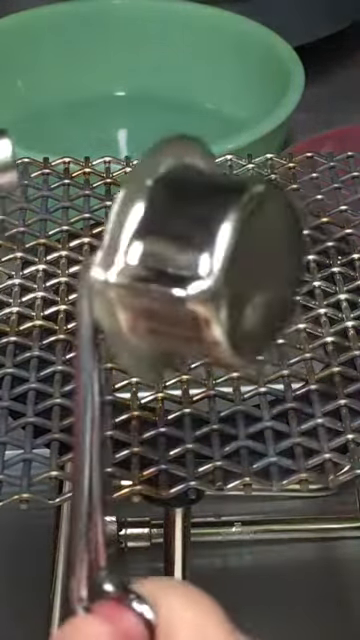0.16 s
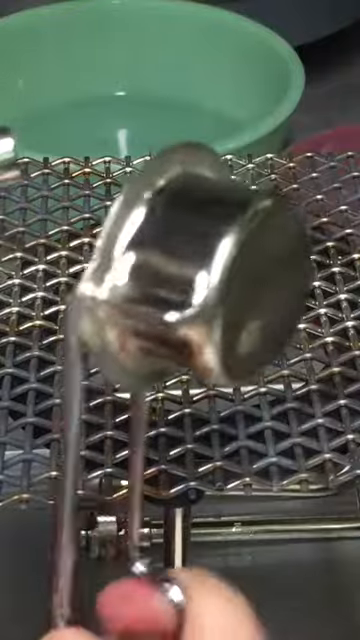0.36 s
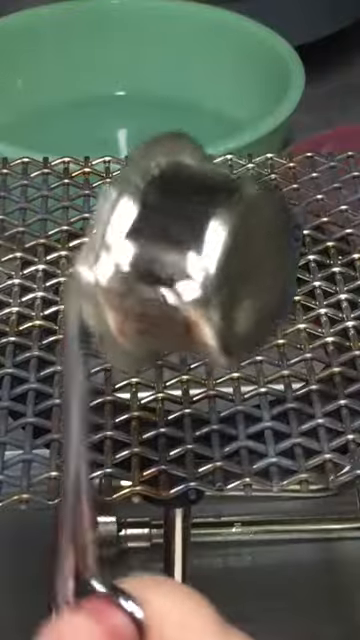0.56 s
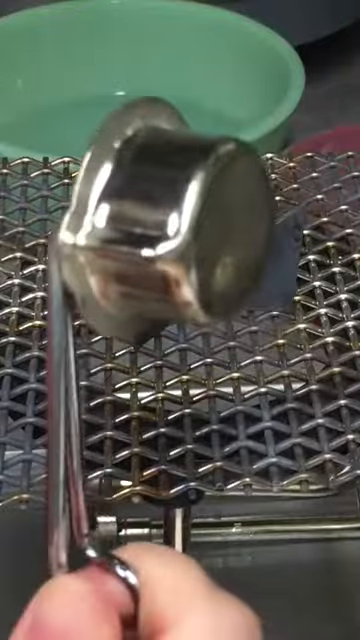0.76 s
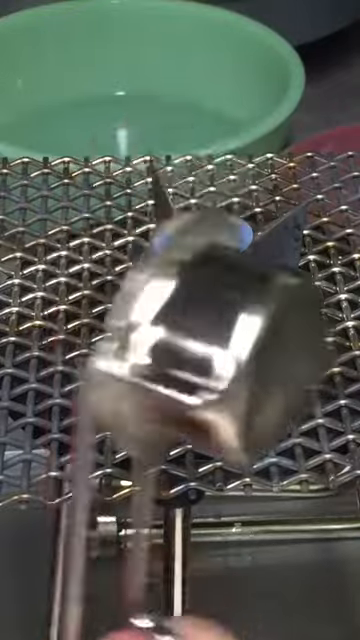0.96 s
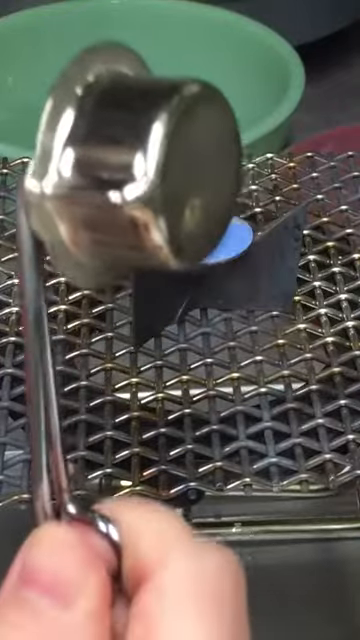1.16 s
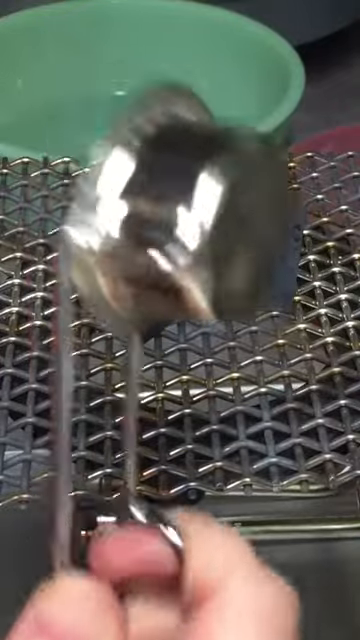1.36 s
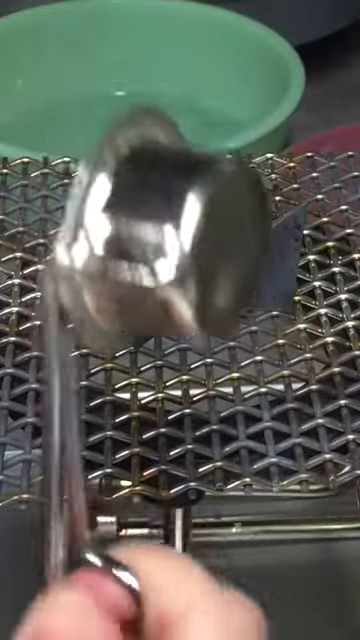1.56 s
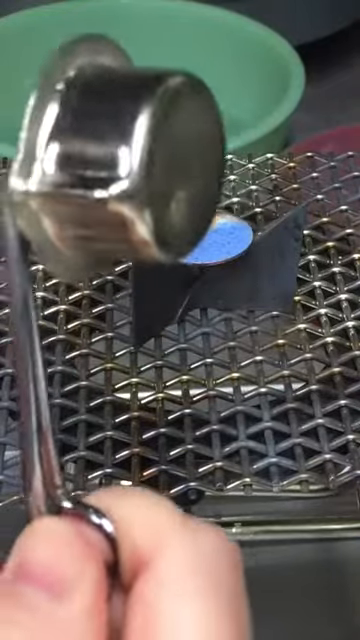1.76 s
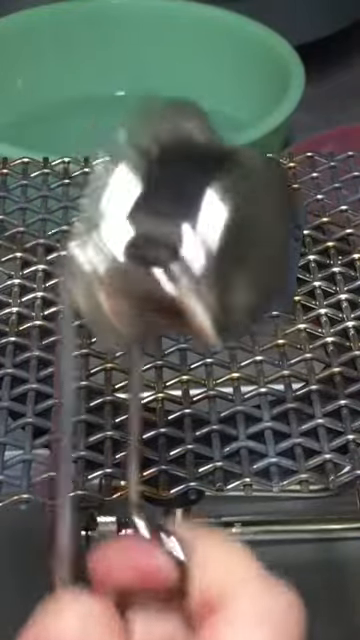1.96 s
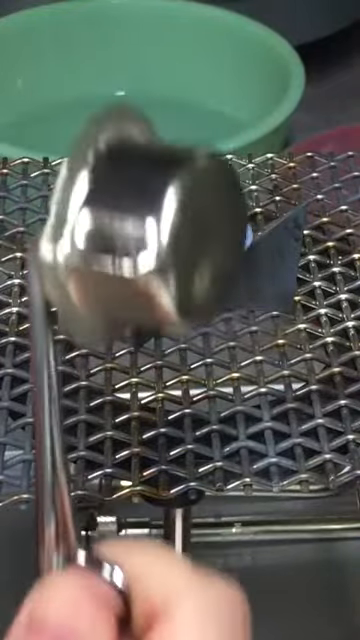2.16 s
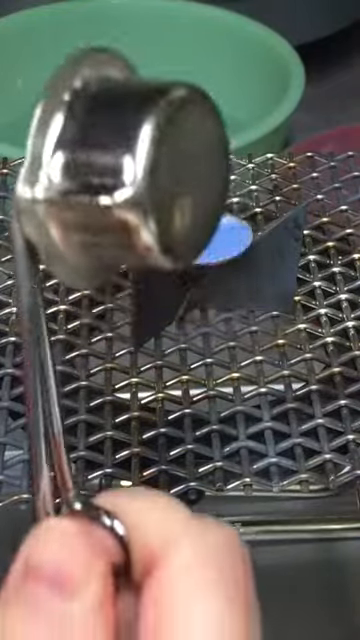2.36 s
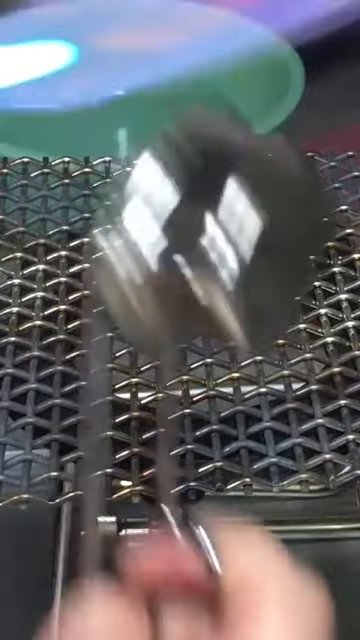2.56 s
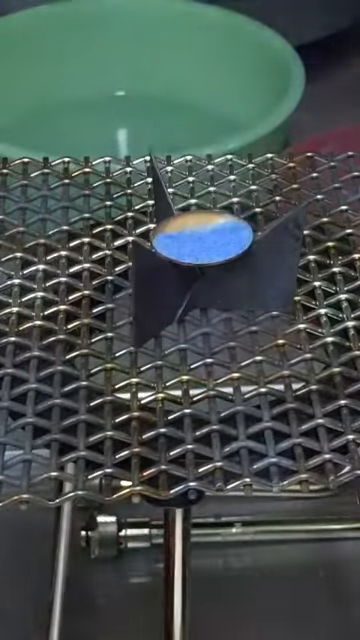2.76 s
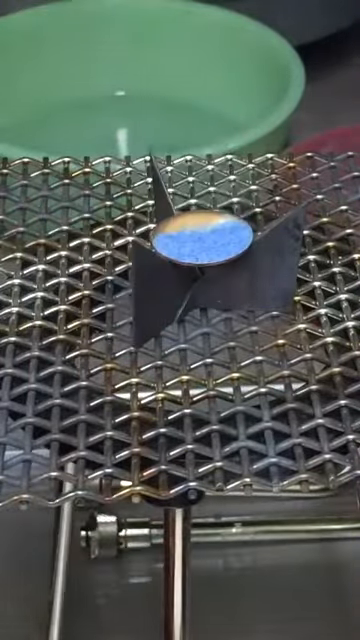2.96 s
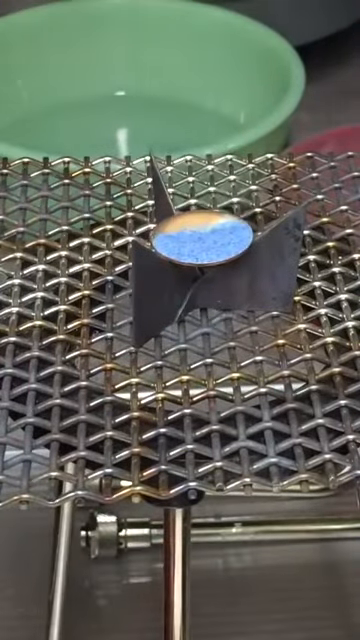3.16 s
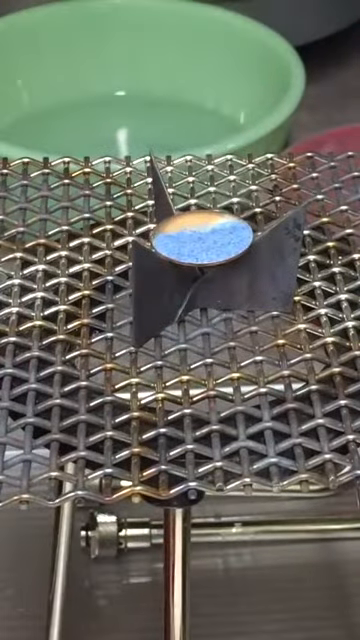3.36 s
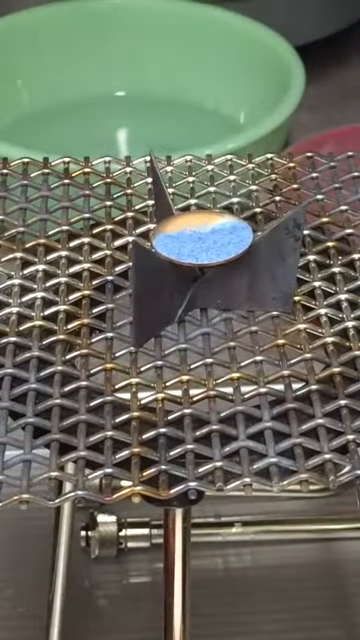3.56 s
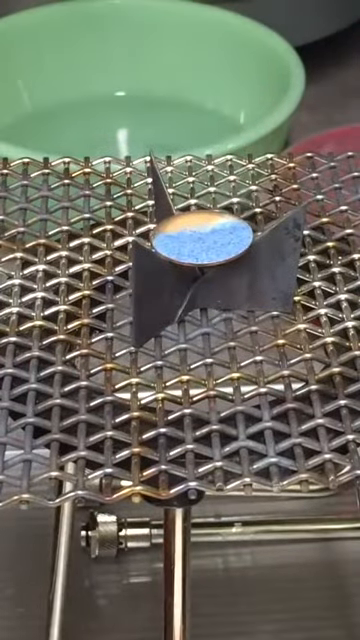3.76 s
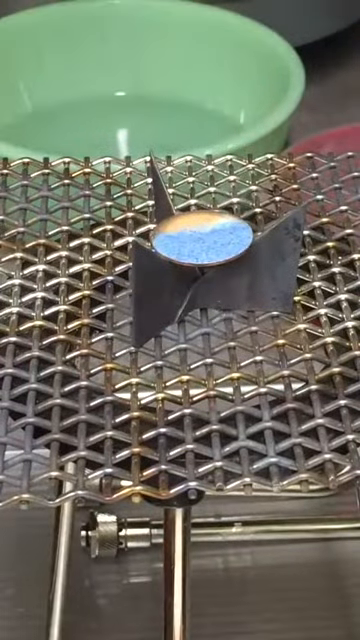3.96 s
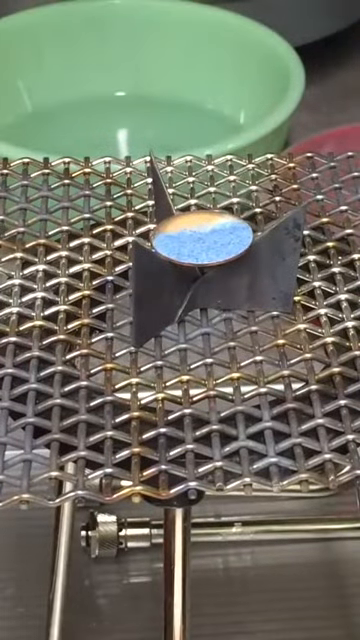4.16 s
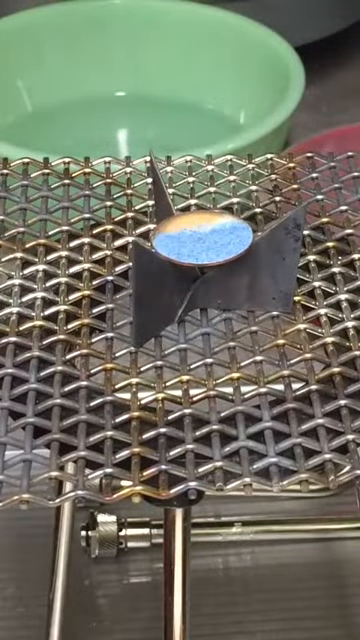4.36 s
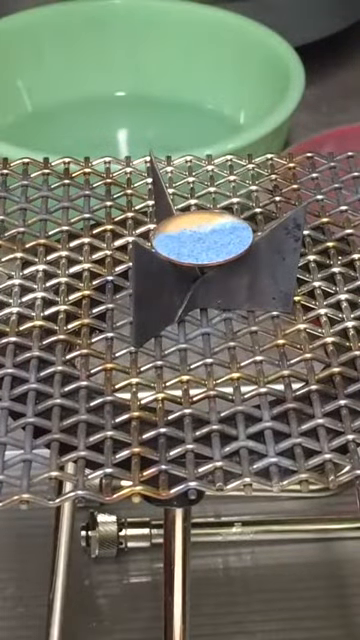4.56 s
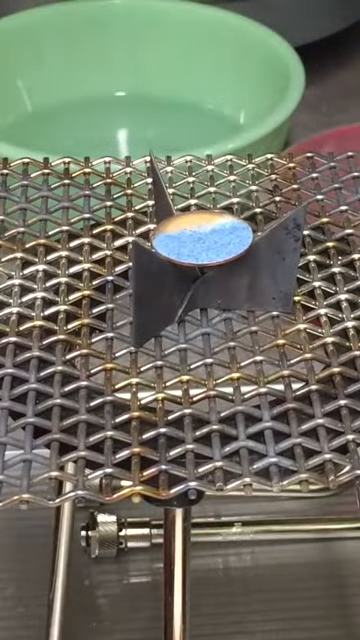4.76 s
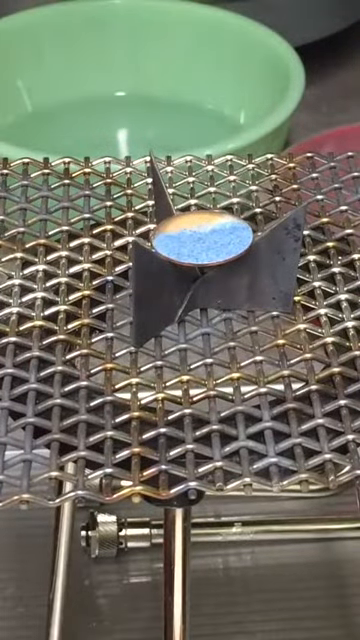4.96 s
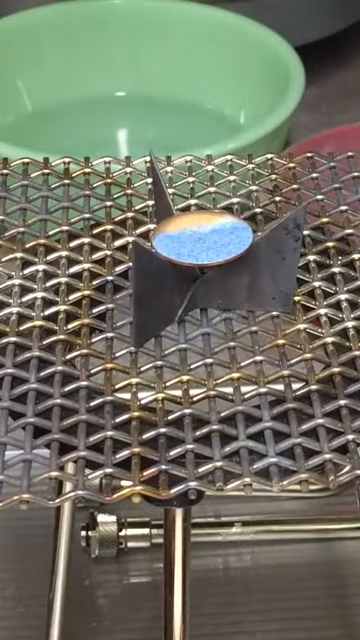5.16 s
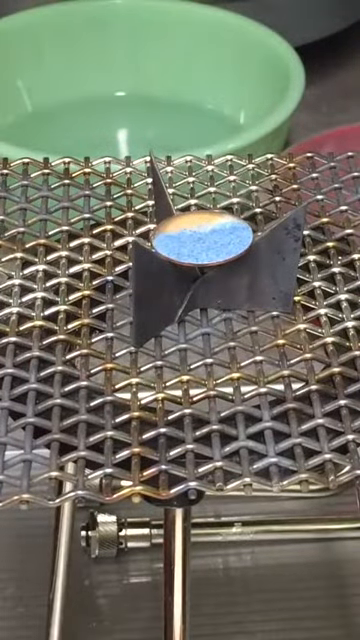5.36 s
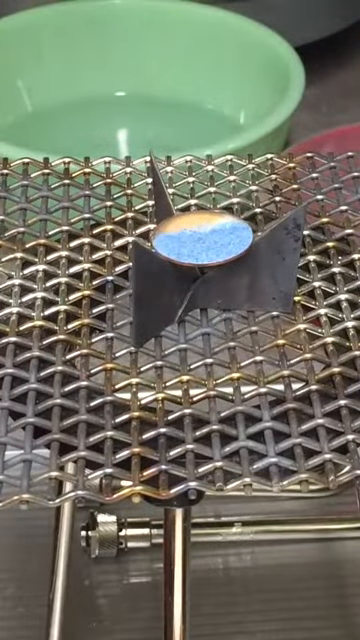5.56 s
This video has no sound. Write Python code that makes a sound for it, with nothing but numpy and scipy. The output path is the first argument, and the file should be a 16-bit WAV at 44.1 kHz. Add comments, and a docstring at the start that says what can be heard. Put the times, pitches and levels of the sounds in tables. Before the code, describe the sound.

In a workshop, a hand-held flint striker is squeezed back and forth about ten times, each stroke a short gritty scrape with a bright steel click, over a faint gas hiss. A torch then catches with a loud pop and burns with a steady, hissing roar. Near the end the flame drops to a quieter, duller sputter. The sound is close, with little echo.

```python
"""In a workshop, a flint striker is squeezed to and fro over its file until a gas torch lights.
Friction and impacts excite the normal modes of the striker's steel cup and spring arms. The gas
ignites with a pop that overloads the input; turbulent combustion then roars, is turned down and
sputters as gas pockets burst. Throughout, the jet hisses and drives standing waves in the nozzle
tube, over a low room hum."""
import sys
import numpy as np
from scipy import signal
from scipy.fft import rfft, irfft, next_fast_len
from scipy.io import wavfile

SR = 44100
rng = np.random.default_rng(int(sys.argv[2]) if len(sys.argv) > 2 else 0)


def transcribe(signal):
    """Save signal, clipped to [-1, 1], as a 16-bit WAV file at the path in sys.argv[1]."""
    frames = np.atleast_2d(signal).T
    limited = np.clip(frames, -1, 1)
    pcm = np.round(limited * 32767).astype(np.int16)
    wavfile.write(sys.argv[1], SR, pcm)


N = 247306

# flint catching on a tooth of the file: start_s, level_db
FLINT_CATCHES = [(0.0024, -25.5), (0.1331, -37), (0.1447, -25), (0.1478, -16.5), (0.1634, -23),
                 (0.177, -14), (0.196, -14.5), (0.1998, -10.5), (0.2204, -16), (0.3877, -29), (0.414, -26),
                 (0.4575, -16), (0.5834, -30.5), (0.5954, -24), (0.6026, -28), (0.6096, -25), (0.622, -30),
                 (0.6363, -15.5), (0.6523, -20), (0.8778, -17.5), (0.902, -18.5), (0.912, -18),
                 (1.067, -34), (1.0775, -19), (1.083, -15), (1.0986, -7.5), (1.1235, -5), (1.143, -12),
                 (1.3876, -22.5), (1.404, -26), (1.416, -21), (1.427, -13.5), (1.5952, -16.5),
                 (1.6004, -12.5), (1.6193, -9.5), (1.6442, -5.5), (1.6654, -13), (1.9364, -13.5),
                 (1.955, -15.5), (1.976, -13.5), (2.141, -29.5), (2.1561, -10.5), (2.177, -8.5),
                 (2.195, -10.5), (2.2096, -13.5), (2.218, -9.5), (2.5357, -14.5)]
# strokes of the flint; return strokes bite higher and ring the cup less:
# start_s, end_s, rasp_db, bite_hz, cup_share_db, finger_rumble_db
FLINT_STROKES = [(0.142, 0.244, -34, 3230, 4, -68), (0.403, 0.473, -31.5, 3780, -0.5, -62.5),
                 (0.575, 0.667, -28, 3280, 12, -61), (0.892, 0.934, -27.5, 3900, -10, -68),
                 (1.078, 1.16, -53, 3180, 2.5, -62.5), (1.393, 1.454, -30, 4020, -5, -65),
                 (1.598, 1.684, -42, 3170, 2.5, -62.5), (1.947, 2, -27, 3940, -12, -65),
                 (2.166, 2.234, -33, 3300, 1, -59.5), (2.558, 2.583, -20.5, 4000, -4, -58)]
def friction():
    """Sliding friction: each catch is a decaying burst of grit, each stroke a sustained rasp."""
    grind_s, cup_fade_db_per_s = 0.0058, 122  # the cup rings less as the flint travels along the file
    cup, arms, rasp, bite = np.zeros((4, N))
    age = np.arange(4000) / SR
    grind = (1 - np.exp(-age / 0.00056)) * np.exp(-(age / grind_s) ** 1.05)
    for s, db in FLINT_CATCHES:
        nearest_stroke = min(FLINT_STROKES, key=lambda row: abs(row[0] + row[1] - 2 * s))
        start, *_, cup_db, _ = nearest_stroke
        i = round(s * SR)
        cup[i:i + len(age)] += amp(db + cup_db - cup_fade_db_per_s * abs(s - start)) * grind
        arms[i:i + len(age)] += amp(db) * grind
    sliding = grains(per_s=12000, spread_db=4.5) * amp(0.79 * drift(89))
    for start, end, rasp_db, bite_hz, *_ in FLINT_STROKES:
        i, j = round(start * SR), round(end * SR)
        rasp[i:j] = amp(rasp_db) * signal.windows.tukey(j - i, .3) * sliding[i:j]
        bite[i:j] = band(rasp[i:j], bite_hz - 450, bite_hz + 450)
    grit = grains(per_s=8500, spread_db=7.5)
    return cup * grit + amp(-2.5) * rasp, arms * grit + amp(-3.5) * rasp, bite


# impacts of steel on steel: start_s, level_db
STEEL_KNOCKS = [(0.179, -1), (0.199, -5), (0.2278, -6), (0.459, -7.5), (0.655, 3), (0.918, -4),
                (0.9224, 2.5), (0.9326, 8), (1.08, -7), (1.0848, -10), (1.123, 1.5), (1.4165, -7),
                (1.4406, 6), (1.6025, -1), (1.6245, 3), (1.9768, -11), (1.9899, 6.5), (2.162, -0.5),
                (2.2169, 3), (2.229, -12), (2.535, 4.5), (2.5855, -2.5), (2.5964, -0.5)]
# normal modes of the cup and of the spring arms: pitch_hz, bandwidth_hz, gain_db
CUP_MODES = [(1780, 43, -15.5), (2335, 110, -5.5), (2876, 93, -2.5), (3055, 120, 2), (3300, 130, 2),
             (3515, 148, 3.5), (4030, 81, -10.5)]
ARM_MODES = [(6260, 130, -8), (7460, 130, -9), (8450, 90, -2), (9110, 90, -3), (9420, 80, -5),
             (9850, 60, 0), (11600, 280, -7), (13200, 260, -8), (14800, 200, -6)]
def striker():
    """Modal excitation: friction and impacts ring the cup and arms, and also radiate directly."""
    cup_force, arm_force, bite = friction()
    knocks = clicks_at(*np.transpose(STEEL_KNOCKS))
    crack = knocks + amp(-9.5) * decay(knocks, tau_s=0.0008) * rng.standard_normal(N)
    # a moving contact point drives each mode unevenly
    cup = amp(9.5) * resonate(cup_force + amp(-13) * crack, CUP_MODES, shifting_db=3.5)
    arms = amp(8.5) * resonate(arm_force + amp(-0.5) * crack, ARM_MODES, shifting_db=5)
    low_scrape = amp(-2) * band(cup_force, 1726, 5630) + amp(-13.5) * band(cup_force, 930, 1590)
    high_scrape = amp(-4.5) * band(arm_force, 3800, 16300) + amp(8) * bite
    snap = amp(-1.5) * band(crack, 6200, 16300)
    thud = amp(-35) * band(knocks, 40, 1100)
    return band(cup + arms, 660, 19400) + low_scrape + high_scrape + snap + thud


IGNITION_S, TURNED_DOWN_S = 2.573, 4.78
# octave bands of the ignition pop: centre_hz, level_db, t60_s
POP_BANDS = [(76, -18, 0.45), (127, -4.5, 0.11), (245, -3.5, 0.1), (410, 3.5, 0.047), (696, 3.5, 0.051),
             (1230, -2.5, 0.029), (1930, 1, 0.021), (3390, -6, 0.021), (7600, -30, .015)]
def pop():
    """Sudden expansion: the gas ignites in noise that dies faster in the treble, over a room boom."""
    boom_hz, boom_db, boom_t60_s = 84.7, 3.5, 0.098
    age = np.maximum(np.arange(N) / SR - IGNITION_S, 0)
    rise = 1 - np.exp(-age / 0.00071)
    out = amp(boom_db - 60 * age / boom_t60_s) * np.sin(2 * np.pi * boom_hz * age)
    for hz, db, t60_s in POP_BANDS:
        noise = unit(band(rng.standard_normal(N), hz / np.sqrt(2), hz * np.sqrt(2)))
        out = out + amp(db - 60 * age / t60_s) * rise * noise
    return out


# course of the flame, with its spectral tilt above 1 kHz: time_s, level_db, tilt_db_per_octave
FLAME_COURSE = [(2.545, -75, 0), (2.56, -34.5, -2), (2.6, -25.5, -4.5), (2.72, -33.5, 4), (2.85, -27, 2),
                (3.3, -24.5, 1.5), (4, -26, 1.5), (4.3, -25.5, 1.5), (4.7, -27.5, 2), (4.79, -36.5, -4),
                (5.2, -34, -8.5), (5.61, -36.5, -5.5)]
# spectral density of the roar: frequency_hz, relative_db
ROAR_SPECTRUM = [(30, -41), (80, -15), (165, -14), (250, -0.5), (500, -1), (1200, 3), (2400, -4.5),
                 (4400, -7.5), (5500, -15), (9500, -27), (11000, -31.5), (16000, -36)]
# peaks and notches from interference with reflections off the bench: centre_hz, width_hz, gain_db
BENCH_INTERFERENCE = [(612, 36, 7.5), (737, 72, 7), (960, 22, -14), (1230, 67, 1.5), (1224, 25, -6.5),
                      (2100, 140, 0.5), (2408, 40, 7), (3164, 41, 1.5), (3300, 74, -2.5), (3670, 300, -3.5),
                      (4000, 33, -0.5), (4950, 1300, -8), (5790, 130, 2), (5780, 37, -25.5),
                      (7050, 97, 3.5), (7500, 220, -5.5), (9130, 150, 5), (10400, 290, -2)]
def flame(bursts):
    """Turbulent combustion: octave bands flutter partly together; bursting pockets lift the treble."""
    roar_db, brightness = curves(FLAME_COURSE)
    t = np.arange(N) / SR
    rumble_db = 1.5 + 8 * np.exp(-np.maximum(t - IGNITION_S, 0) / 0.33)  # surges at ignition, settles
    flutter_depth = np.where(t < TURNED_DOWN_S, 0.71, 1.4)
    # small pressure spikes scattered through the roar share its colour
    crackle = amp(-4) * band(grains(per_s=1100, spread_db=4), 900, 19000, order=1)
    size = next_fast_len(N)
    spectrum = rfft(coloured(ROAR_SPECTRUM, rng.standard_normal(N) + crackle), size)
    hz = np.arange(len(spectrum)) * SR / size
    bench_db = sum(db / (1 + (2 * (hz - mid) / width) ** 2) for mid, width, db in BENCH_INTERFERENCE)
    spectrum *= amp(bench_db)
    octave = np.clip(np.log2(np.maximum(hz, 1) / 125), 0, 7)
    flare = amp(19) * decay(bursts, tau_s=0.0029)
    shared_flutter = 0.17 * drift(11) + 1.9 * drift(85)
    out = 0
    for k in range(8):
        octave_noise = irfft(spectrum * np.maximum(1 - np.abs(octave - k), 0), size)[:N]
        tilt_db = rumble_db if k == 0 else brightness * max(k - 3, 0)
        flutter_db = flutter_depth * (shared_flutter + 0.98 * drift(38))
        flare_share = np.clip((k - 1.5) / 1.8, 0, 1)
        out = out + (amp(tilt_db + flutter_db) + flare * flare_share) * octave_noise
    lit = t > FLAME_COURSE[0][0]
    return lit * amp(roar_db) * out


# the clearest gas pockets bursting in the flame: start_s, level_db
POCKET_BURSTS = [(3.391, -16), (3.5105, -14), (3.957, -10), (4.6298, -12), (4.713, -13), (4.79, -19),
                 (4.932, -26), (4.9576, -27), (4.9988, -19), (5.0563, -22), (5.133, -22), (5.1553, -22),
                 (5.1851, -22), (5.217, -20), (5.238, -21), (5.336, -18), (5.3864, -16), (5.4036, -16),
                 (5.4502, -16), (5.489, -20), (5.526, -17.5), (5.577, -19)]
def pockets():
    """Impulse train of bursting pockets: small ones join at random gaps once the flame is low."""
    gap_s, small_db, spread_db = 0.03, -28, 4
    gap_chance, size_chance = rng.standard_normal((60, 2)).T
    times = TURNED_DOWN_S + np.cumsum(gap_s * np.exp(0.4 * gap_chance))
    heard = times < N / SR - .001
    small = clicks_at(times[heard], small_db + spread_db * size_chance[heard])
    return clicks_at(*np.transpose(POCKET_BURSTS)) + small


def sputters(bursts):
    """Pressure transients: each pocket radiates a dull click and a short puff."""
    puffs = decay(bursts, tau_s=0.0039) * rng.standard_normal(N)
    return amp(-5.5) * (band(bursts, 600, 5100) + band(puffs, 590, 3230))


# course of the hiss at the nozzle: time_s, level_db, midrange_gain_db
GAS_COURSE = [(0, -50.5, 1.5), (1.2, -51, 1), (2.5, -49, -2), (2.7, -65.5, 15), (4.7, -53.5, 6),
              (4.9, -50.5, -22), (5.61, -49.5, -11)]
# standing waves of the nozzle tube: pitch_hz, bandwidth_hz, gain_db
NOZZLE_MODES = [(738, 35, -13), (1500, 41, 0), (2310, 48, -4), (2780, 22, -13), (3080, 49, -7),
                (3300, 37, -12), (3920, 62, -3), (4710, 42, -4), (5550, 49, -8), (6340, 160, -4),
                (7120, 90, -1), (7420, 44, -14), (7880, 120, -2), (8680, 110, -3), (9420, 85, -6),
                (9940, 99, -10), (11000, 98, -11), (11900, 210, -6), (12700, 180, -2), (13400, 310, -6),
                (14100, 290, -7), (15300, 68, -8)]
# spectral density of the jet: frequency_hz, relative_db
JET_SPECTRUM = [(180, -41), (300, -10.5), (1250, -14), (1480, 1), (1870, -16), (2280, 2), (2650, -10),
                (3890, -1), (5160, -7), (13800, -0.5), (16000, 0.5)]
def gas():
    """Jet noise: a broadband hiss, part of which excites standing waves in the nozzle tube."""
    hiss_db, midrange_db = curves(GAS_COURSE)
    equal_modes = [(hz, width, 0) for hz, width, _ in NOZZLE_MODES]
    ringing = resonate(rng.standard_normal(N), equal_modes)
    whistles = unit(resonate(ringing, NOZZLE_MODES))  # filtering twice steepens the peaks
    jet = whistles + amp(-0.5) * coloured(JET_SPECTRUM)
    midrange = band(jet, 1200, 12100, order=1)
    return amp(hiss_db + 1.3 * drift(9.6)) * (jet + (amp(midrange_db) - 1) * midrange)


# a faint metallic rattle: start_s, end_s, level_db, low_hz, high_hz
METAL_RATTLE = (3.502, 3.595, -41, 8700, 10000)
def rattle():
    """Band-limited shot noise: loose clicks heard only in a narrow, bright band."""
    start, end, db, low_hz, high_hz = METAL_RATTLE
    shaking = np.interp(np.arange(N) / SR, [start, start + .004, end - .02, end], [0, 1, .7, 0])
    return amp(db) * unit(band(grains(per_s=900, spread_db=2.5), low_hz, high_hz)) * shaking


def grip(fade_db_per_s=226):
    """Handling noise: the fingers' rumble on the handle swells into each stroke and dies after it."""
    t = np.arange(N) / SR
    levels_db = [db - fade_db_per_s * np.abs(t - np.clip(t, start, end))
                 for start, end, *_, db in FLINT_STROKES]
    return amp(np.max(levels_db, axis=0)) * unit(band(rng.standard_normal(N), 130, 302))


def reverberation(x, t60_s, level_db):
    """Diffuse reflection: convolution with exponentially decaying noise."""
    age = np.arange(SR // 3) / SR
    tail = rng.standard_normal(len(age)) * amp(-60 * age / t60_s) * (age > .003)
    return amp(level_db) * signal.fftconvolve(x, tail / np.sqrt(np.sum(tail ** 2)))[:N]


# spectral density of the room's hum: frequency_hz, relative_db
HUM_SPECTRUM = [(18, -68), (30, -73), (81, 15), (119, -3), (286, -12), (433, -24), (600, -43), (780, -59),
                (1320, -120)]
def room_hum():
    """Stationary noise: a faint hum concentrated in the bass."""
    return amp(-72.5) * coloured(HUM_SPECTRUM)


def amp(db):
    """Amplitude ratio of a level in decibels."""
    return 10 ** (np.asarray(db) / 20)


def unit(x):
    """Normalisation to rms 1."""
    return x / np.sqrt(np.mean(x ** 2) + 1e-20)


def curves(rows):
    """Linear interpolation of (time_s, value, ...) rows at every sample."""
    times, *columns = np.transpose(rows)
    return [np.interp(np.arange(N) / SR, times, column) for column in columns]


def band(x, low_hz, high_hz, order=2):
    """Butterworth band-pass filtering."""
    sos = signal.butter(order, [low_hz, min(high_hz, .45 * SR)], "band", fs=SR, output="sos")
    return signal.sosfilt(sos, x)


def coloured(spectrum, x=None):
    """Spectral shaping of white noise, or of the given source; rms 1."""
    hz, db = np.transpose(spectrum)
    grid_hz = np.maximum(np.arange(N // 2 + 1) * SR / N, 1)
    gain = amp(np.interp(np.log(grid_hz), np.log(hz), db))
    x = rng.standard_normal(N) if x is None else x
    return unit(irfft(rfft(x) * gain, N))


def resonate(x, modes, shifting_db=0):
    """Modal superposition: damped resonators of alternating sign, whose drives may each wander."""
    out = 0
    for k, (hz, width, db) in enumerate(modes):
        r = np.exp(-np.pi * width / SR)
        feedforward = [(1 - r * r) / 2, 0, (r * r - 1) / 2]
        feedback = [1, -2 * r * np.cos(2 * np.pi * hz / SR), r * r]
        drive = x * amp(shifting_db * drift(10.4)) if shifting_db else x
        out = out + (-1) ** k * amp(db) * signal.lfilter(feedforward, feedback, drive + 1e-18)
    return out


def decay(clicks, tau_s):
    """Exponential relaxation after each impulse."""
    return signal.lfilter([1], [1, -np.exp(-1 / (tau_s * SR))], clicks + 1e-18)


def drift(rate_hz):
    """Random fluctuation: low-passed noise of rms 1."""
    r = np.exp(-2 * np.pi * rate_hz / SR)
    return unit(signal.lfilter([1], [1, -2 * r, r * r], rng.standard_normal(N + SR))[SR:])


def grains(per_s, spread_db):
    """Shot noise: random clicks of very uneven size; rms 1."""
    sizes = amp(spread_db * np.minimum(rng.exponential(1, N), 4)) * rng.choice([-1, 1], N)
    return unit(sizes * (rng.random(N) < per_s / SR))


def clicks_at(times, db):
    """Impulse train with one click per event."""
    out = np.zeros(N)
    out[np.round(np.asarray(times) * SR).astype(int)] = amp(db)
    return out


def scene():
    """Superposition: all sources and the workshop's reflections add at one microphone."""
    bursts = pockets()
    steel = striker()
    fire = flame(bursts) + sputters(bursts)
    background = gas() + room_hum() + grip()
    echoes = reverberation(steel, t60_s=0.19, level_db=-14)
    echoes += reverberation(fire, t60_s=0.067, level_db=-9)
    return (steel + fire + echoes + background + pop() + rattle())[None]


def record(dry):
    """Hard clipping: the pop overloads the input, then a low-pass removes the highest treble."""
    low_pass = signal.cheby2(22, 70, 16100, fs=SR, output="sos")
    return signal.sosfilt(low_pass, np.clip(dry, -.94, .94))


dry = scene()
out = record(dry)
transcribe(out)
```